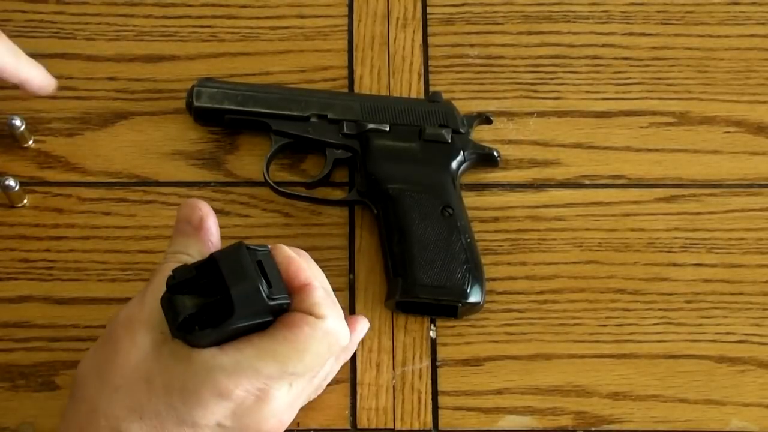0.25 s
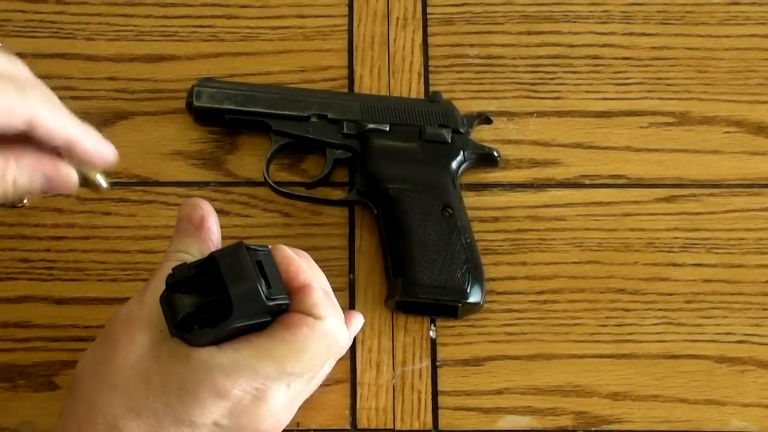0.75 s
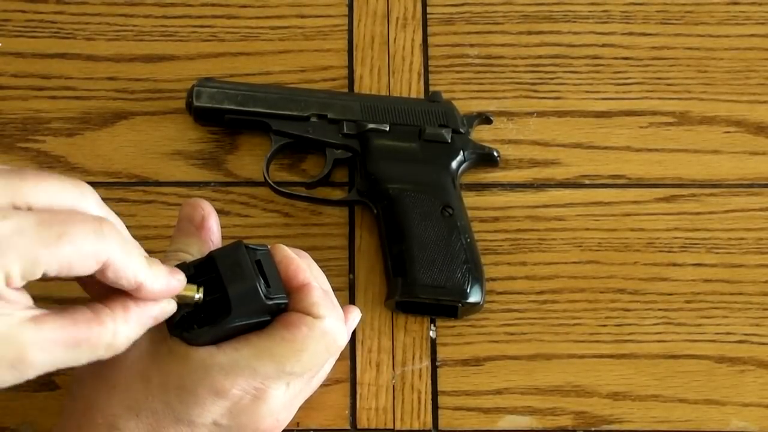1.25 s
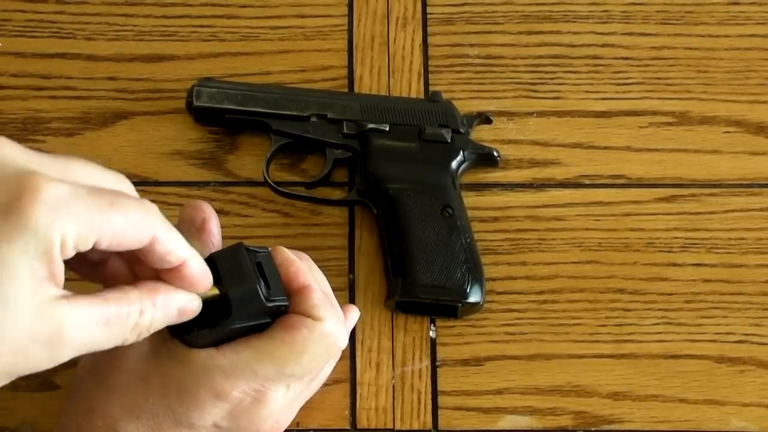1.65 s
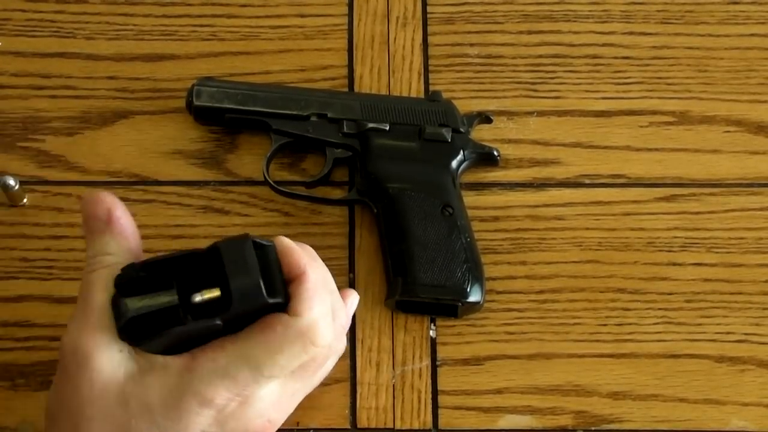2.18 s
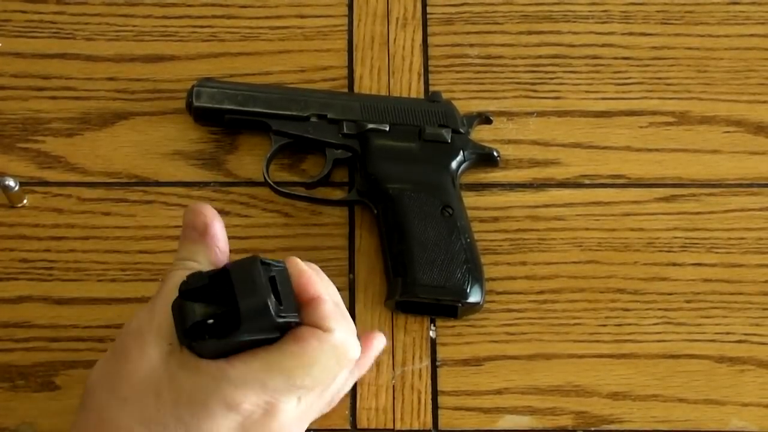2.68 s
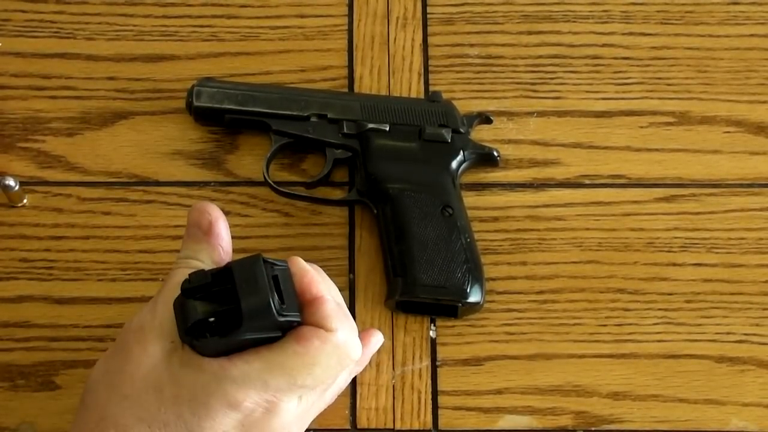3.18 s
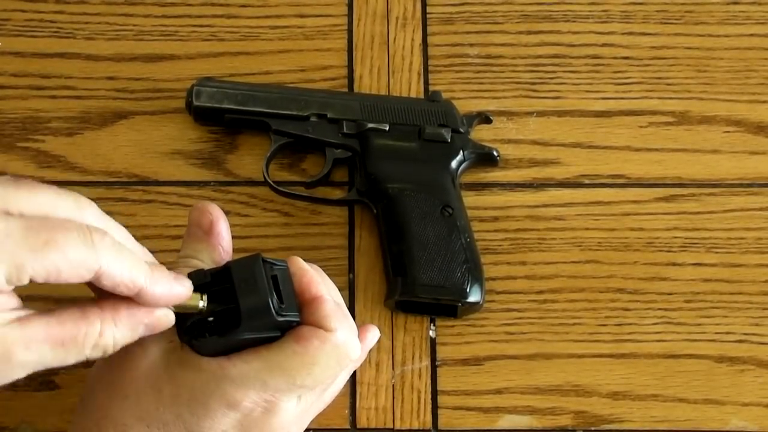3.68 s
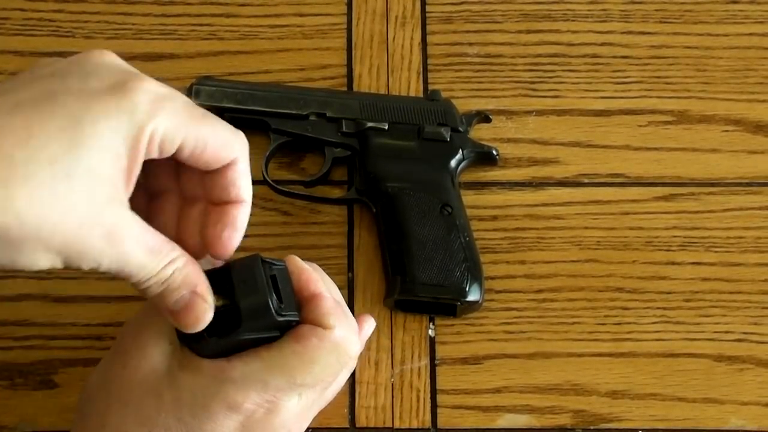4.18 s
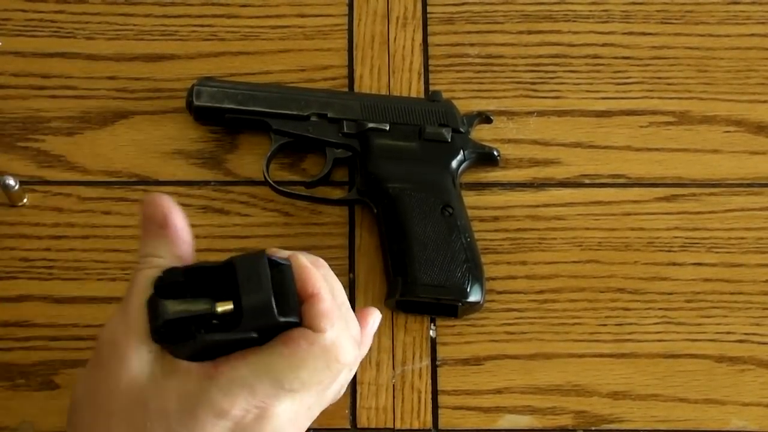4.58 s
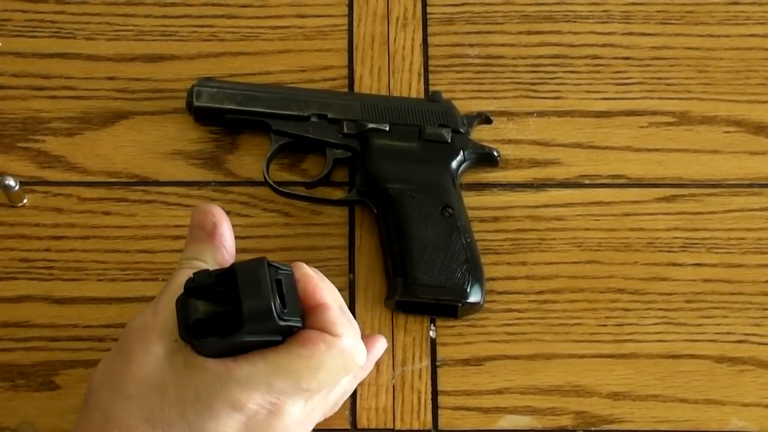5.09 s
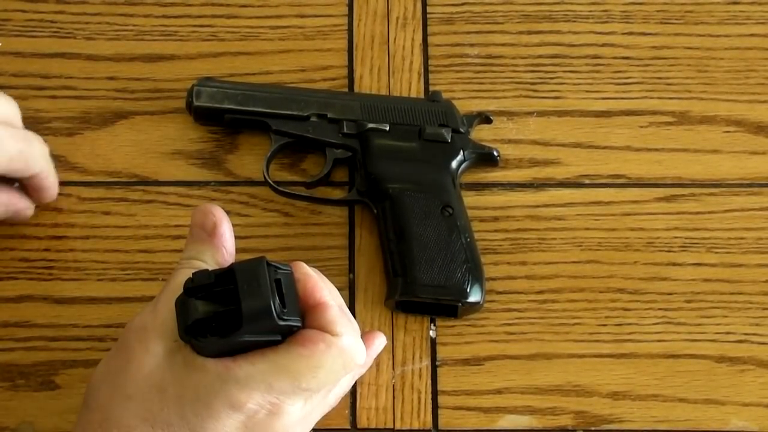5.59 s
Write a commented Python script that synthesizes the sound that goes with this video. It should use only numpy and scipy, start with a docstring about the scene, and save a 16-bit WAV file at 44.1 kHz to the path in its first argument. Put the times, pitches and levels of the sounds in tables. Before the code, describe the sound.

Clusters of dry metal clicks, plastic taps and tiny gritty slides alternate with near-quiet pauses. The strongest crack comes early as one cartridge seats; a softer round of clicking follows later, ending with plastic knocks and a soft forearm rub on the table. Recorded very close in stereo, in a lived-in room with a short tail, over low rumble, slight mains hum and hiss.

```python
"""Sharp metallic clicks and slides close by: a hand presses cartridges into a pistol magazine with a plastic
loader on a wooden table. Brass, steel and plastic are struck or rubbed by noise and answer with their resonances;
the table top knocks and is rubbed. Decaying noise echoes form a furnished room, over a low rumble, mains hum
and microphone hiss made of shaped noise and a wavering sine."""
import sys
import numpy as np
from scipy import signal
from scipy.fft import rfft, irfft, next_fast_len
from scipy.io import wavfile
from scipy.ndimage import map_coordinates

SR = 44100
rng = np.random.default_rng(int(sys.argv[2]) if len(sys.argv) > 2 else 0)


def persist_wave(psi):
    """Save psi, clipped to +-1, as 16-bit WAV."""
    counts = np.round(np.clip(psi, -1, 1) * 32767).astype(np.int16)
    wavfile.write(sys.argv[1], SR, np.atleast_2d(counts).T)


N = 257984  # length in samples

# brass and steel clicking in the loader: start_s, loader_level_db, pitch_hz, table_level_db, metal_level_db
METAL_CLICKS = [(0.0386, -8, 6120, -35.5, -29.5), (0.0573, -25, 6100, -30.5, -42.5),
                (0.1295, -13, 3370, -37, -34), (0.19, -18, 3920, -33.5, -30),
                (0.2577, -7, 2930, -12.5, -25), (1.0682, -18.5, 3960, -30.5, -38),
                (1.2495, -13, 4564, -49, -45.5), (1.2781, -8, 3906, -45, -35),
                (1.408, 4.5, 6350, -20, -0.5), (1.4344, -22, 5475, -31, -27.5),
                (1.497, -5.5, 3170, -18.5, -9.5), (1.6129, -10.5, 4990, -36.5, -42.5),
                (1.9538, -37.5, 6420, -67, -34), (1.98, -15, 6440, -46, -17.5),
                (2.0081, -11.5, 4070, -31.5, -14.5), (2.021, -5.5, 5140, -37.5, -27.5),
                (2.0264, -6.5, 6150, -44, -12), (2.0339, -12.5, 5400, -38, -20),
                (2.089, -18.5, 3910, -48.5, -24.5), (2.151, -21.5, 2880, -51, -34),
                (2.4652, -13, 3340, -44, -13.5), (2.606, -20.5, 4320, -37, -37),
                (2.6956, -15, 4013, -21.5, -11), (2.7081, -5.5, 4760, -32.5, -25.5),
                (3.6698, -12, 5900, -35.5, -36), (3.834, -32.5, 5650, -60, -44),
                (3.9375, -25.5, 4830, -69, -85), (3.9885, -30.5, 6710, -48, -61),
                (4.115, -8, 4070, -23.5, -33), (4.3089, -11.5, 4190, -57, -27),
                (4.3134, -16.5, 5870, -51, -22), (4.3347, -18.5, 5990, -40, -28),
                (4.352, -20, 3890, -37, -32), (4.3832, -12.5, 3800, -34, -25),
                (4.6817, -13, 4870, -40, -25), (4.805, -22.5, 5970, -35, -38)]
# plastic knocking on plastic and wood: start_s, shell_level_db, loader_level_db, table_level_db
PLASTIC_KNOCKS = [(0.201, -23.5, -20, -22), (0.5652, -32, -42, -39), (0.5984, -20, -32.5, -36),
                  (1.3464, -45, -41, -39.5), (1.735, -47, -35, -34), (1.9157, -51, -39, -47),
                  (2.1864, -28, -29, -47.5), (2.2405, -31, -31.5, -49), (2.2481, -23, -30.5, -42),
                  (2.2867, -40, -34, -38.5), (2.3894, -32.5, -37, -55), (2.797, -25, -23.5, -24.5),
                  (3.1881, -35.5, -62, -41.5), (4.4148, -28, -28, -56), (4.4749, -34, -35, -35.5),
                  (4.5164, -24, -29, -62), (4.596, -46, -43.5, -60), (4.6275, -30, -39, -58),
                  (4.7723, -24, -24, -57), (4.8165, -51, -37, -30), (4.8332, -26.5, -27, -40),
                  (4.9572, -22, -32, -22.5), (5.6343, -23, -37, -34.5)]
SHELL_DB, SHELL_DB_PER_OCT = -11, -8.5  # shell level against the loader for a click at 4 kHz, and its slope
KNOCK_PITCH_HZ, KNOCK_METAL_DB = 3240, -30  # metal level against the loader
CLICK_T60_S, KNOCK_T60_S = 0.014, 0.028  # rattle after the crack
CLICK_RISE_S, KNOCK_RISE_S = 0.0018, 0.001  # time constants of the onset
BOUNCE_S, BOUNCE_SCATTER_S, BOUNCE_DB = 0.011, 0.002, -16


def contacts():
    """Restitution: every contact lands a second time, weaker; deeper clicks put more of their blow into the shell.

    Columns: start_s, loader_db, table_db, shell_db, metal_db, rattle_t60_s, pitch_hz, rise_s."""
    rows = []
    for start_s, loader_db, pitch_hz, table_db, metal_db in METAL_CLICKS:
        shell_db = loader_db + SHELL_DB + SHELL_DB_PER_OCT * np.log2(pitch_hz / 4000)
        rows.append((start_s, loader_db, table_db, shell_db, metal_db, CLICK_T60_S, pitch_hz, CLICK_RISE_S))
    for start_s, shell_db, loader_db, table_db in PLASTIC_KNOCKS:
        metal_db = loader_db + KNOCK_METAL_DB
        rows.append((start_s, loader_db, table_db, shell_db, metal_db,
                     KNOCK_T60_S, KNOCK_PITCH_HZ, KNOCK_RISE_S))
    first = np.array(rows)
    bounce = first + BOUNCE_DB * np.array([0, 1, 1, 1, 1, 0, 0, 0])
    bounce[:, 0] += BOUNCE_S + BOUNCE_SCATTER_S * rng.standard_normal(len(rows))
    return np.vstack([first, bounce])


# resonances of the loader: centre_hz, width_hz, relative_level_db
LOADER_MODES = [(3190, 1120, 7.5), (3710, 650, 13.5), (4530, 2640, 6), (5356, 283, 11.5), (5980, 3050, 9),
                (7930, 1230, -8.5)]
# resonances of the table top: centre_hz, width_hz, relative_level_db
TABLE_MODES = [(330, 154, -3.5), (443, 55, 9.5), (550, 144, 7), (816, 197, 9), (1000, 210, -2),
               (1493, 350, -5.5)]
# resonances of the plastic shell: centre_hz, width_hz, relative_level_db
SHELL_MODES = [(1428, 483, 5.5), (1770, 212, -1.5), (2170, 392, 8.5), (2746, 690, -8.5), (4104, 1600, -7)]
# resonances of the metal parts: centre_hz, width_hz, relative_level_db
METAL_MODES = [(8090, 2300, -1.5), (10500, 1540, -1.5), (10970, 1700, 1), (13600, 670, -5.5),
               (14360, 5300, -11)]
# resonances of the table frame: centre_hz, width_hz, relative_level_db
FRAME_MODES = [(89.6, 93, 0), (156, 90, 0.0056)]
FRAME_DB = -17  # against the table top


def clicks():
    """Impact excitation: a crack and a short rattle ring the modes of the loader, table, shell, metal and frame.

    Rows: sound at the ports, its left-right part, and the even average over directions that fills the room."""
    size = 4096
    out = np.zeros((3, N + size))
    t = np.arange(size) / SR
    f = np.fft.rfftfreq(size, 1 / SR)
    loader, table, shell, metal, frame = [
        modal(modes, f) for modes in (LOADER_MODES, TABLE_MODES, SHELL_MODES, METAL_MODES, FRAME_MODES)]
    loader_hz, shell_hz = np.array(LOADER_MODES)[:, :1], np.array(SHELL_MODES)[:, :1]
    scatter_db = np.array([3, 3, 1.3])[:, None, None]  # directions differ more than the room average
    for start_s, loader_db, table_db, shell_db, metal_db, t60_s, pitch_hz, rise_s in contacts():
        crack = 2.2 * amp(-60 * t / 0.00341)
        shape = (amp(-60 * t / t60_s) + crack) * (1 - np.exp(-t / rise_s))
        blow = rfft(rng.standard_normal((2, size)) * shape)
        blow = np.vstack([blow, np.ones(len(f))])[:, None]  # the room row gets a bare impulse
        # modes near the contact's pitch ring most
        struck_loader = loader * amp(-9 * np.log2(loader_hz / pitch_hz) ** 2)
        # a blow that goes into the table favours the low modes of the shell
        lean_db = 1.2 * np.clip(table_db - shell_db + 4.5, -12, 12) * np.log2(1900 / shell_hz)
        # plastic damps the treble skirts of the shell modes
        struck_shell = shell * amp(lean_db) / (1 + 1j * f / 4500) ** 2
        total = 0
        for part, db in ((struck_loader, loader_db), (table, table_db), (struck_shell, shell_db),
                         (metal, metal_db), (frame, table_db + FRAME_DB)):
            ring = blow * part
            # every mode takes its share of the blow, give or take a random few dB
            ring *= np.linalg.norm(part, axis=1, keepdims=True) / np.linalg.norm(ring, axis=2, keepdims=True)
            ring *= amp(scatter_db * rng.standard_normal((len(part), 1)))
            total = total + amp(db) * ring.sum(axis=1) / np.linalg.norm(part)
        energy_scale = np.sqrt(size / 2 * t60_s * SR / (2 * np.log(1000)))  # longer rattles carry more energy
        out[:, round(start_s * SR):][:, :size] += irfft(total, size) * energy_scale
    return out[:, :N]


# sliding parts: start_s, end_s, scrape_level_db at the end, swell_db on the way,
# shell_level_db and table_level_db against the scrape
SLIDE_STROKES = [(0.034, 0.032, -17, 9, -12, -20.5), (0.116, 0.166, -39.5, 2, -13, 0.5),
                 (0.182, 0.194, -24.5, 5.5, -1, -22), (1.594, 1.62, -31.5, 4, -6.5, -13.5),
                 (2.05, 2.24, -45.5, -5, -9, -25), (2.413, 2.455, -31.5, 18.5, -3.5, -37),
                 (2.601, 2.685, -36, 10, -7.5, -9), (3.863, 3.875, -40, 0, -7.5, -16),
                 (4.314, 4.365, -37, -15.5, -17, -34), (4.434, 4.5, -41, 1, -1.5, -16),
                 (4.646, 4.665, -35.5, 1.5, -6.5, -30), (4.81, 4.875, -38.5, 4.5, -9, -6),
                 (4.918, 4.95, -29.5, 10.5, -4.5, 0.5)]
SLIDE_RISE_S, SLIDE_FADE_DB_PER_S = 0.0083, 901.5


def slides():
    """Dry friction: noise with uneven fast grip rings the loader, metal, shell and table."""
    grit = rng.standard_normal(N) * amp(4 * wobble(250) + 2.5 * wobble(40))
    scrape = strokes(SLIDE_STROKES, SLIDE_RISE_S, SLIDE_FADE_DB_PER_S)
    shell_gain, table_gain = amp(np.transpose(SLIDE_STROKES)[4:]) @ scrape
    metal = amp(-13.5) * unit(ringing(grit, METAL_MODES))
    bright = unit(unit(ringing(grit, LOADER_MODES)) + metal)
    shell = shell_gain * unit(ringing(grit, SHELL_MODES))
    table = table_gain * unit(ringing(grit, TABLE_MODES))
    return scrape.sum(axis=0) * bright + shell + table


# magazine base and hand pushing on the table top: start_s, hold_s, level_db
PUSHES = [(0, 0.077, -43.5), (.26, 0.036, -42), (1.505, 0.0067, -39), (1.7, 0.13, -54.5),
          (2.02, 0.085, -50.5), (2.25, 0.014, -44.5), (2.465, 0.023, -36.5), (2.78, 0.105, -47),
          (4.3, .25, -48.5), (4.685, 0.0058, -37), (4.93, .03, -50)]
# table resonances under the pushes: centre_hz, width_hz, relative_level_db
PUSH_MODES = [(212.7, 190, -6), (284, 22, -2), (334, 98, -4.5)]
PUSH_RISE_S, PUSH_FADE_DB_PER_S = 0.015, 138
# forearm dragging over the table top: start_s, hold_s, level_db
FOREARM_DRAGS = [(2.71, 0.06, -45), (4.694, 0.019, -39.5), (5.445, 0.088, -44)]
# table resonances under the forearm: centre_hz, width_hz, relative_level_db
DRAG_MODES = [(172.4, 41, -8), (430.4, 38, -31)]
DRAG_RISE_S, DRAG_FADE_DB_PER_S = 0.046, 192


def rubs():
    """Forced vibration: soft uneven pushes keep the low modes of the table moving."""
    force = rng.standard_normal((2, N)) * amp(1.5 * wobble(30))
    push = held(PUSHES, PUSH_RISE_S, PUSH_FADE_DB_PER_S)
    drag = held(FOREARM_DRAGS, DRAG_RISE_S, DRAG_FADE_DB_PER_S)
    return push * unit(ringing(force[0], PUSH_MODES)) + drag * unit(ringing(force[1], DRAG_MODES))


# reverberation time: frequency_hz, t60_s
ROOM_T60 = [(100, 0.16), (260, 0.17), (700, 0.55), (1840, 0.41), (4850, 0.54), (12800, 0.37)]
# strength of the room answer: frequency_hz, level_db
ROOM_LEVEL = [(100, -9.5), (500, 5.5), (2000, -2.5), (6000, -9.5), (9000, -9), (15000, -9.5)]
# what differs between the two microphone ports: frequency_hz, level_db
PORT_DIFFERENCE = [(100, -17), (500, -32.5), (2000, -33.5), (4000, -18), (8000, -11), (14000, -7)]


def room(x):
    """Reverberation: each frequency dies at its own speed; every 0.1 s of sound meets a new set of echoes."""
    out, step = np.zeros((2, N + 2 * SR)), SR // 10
    for begin in range(0, N, step):
        noise = rng.standard_normal((2, SR // 2))
        hz, t, bands = signal.stft(noise, SR, nperseg=256)
        # close ports hear nearly alike echoes
        apart = amp(along(PORT_DIFFERENCE, hz) + 6)[:, None] * bands[1]
        echoes = bands[0] + apart * np.array([1, -1])[:, None, None]
        decay = amp(-60 * t / along(ROOM_T60, hz)[:, None])
        decay /= np.linalg.norm(decay, axis=1, keepdims=True)
        decay *= amp(along(ROOM_LEVEL, hz))[:, None]
        tail = signal.istft(echoes * decay, SR, nperseg=256)[1] / np.sqrt(128)
        wet = signal.fftconvolve(x[None, begin:begin + step], tail, axes=1)
        out[:, begin + 200:][:, :wet.shape[1]] += wet  # echoes start 200 samples late
    return out[:, :N]


# slow course of the low sounds: time_s, rumble_level_db, hum_level_db
LOW_LEVELS = [(0.0, -50, -47), (0.37, -49.5, -53), (0.72, -57.5, -64.5), (2.64, -54, -50.5),
              (3.89, -61, -61.5), (4.9, -45, -52), (5.85, -60, -61)]
# room tone and hiss spectrum: frequency_hz, relative_level_db per Hz
AIR_SPECTRUM = [(82, -29.5), (140, -13), (221, -3), (239, -5), (328, -4), (451, -4.5), (657, -7),
                (868, -6.5), (958, -8), (1220, -8), (1290, -8), (2970, -8.5), (16000, -25.5)]
AIR_DB = -50


def background():
    """Stationary noise: hiss and room tone, a wandering rumble near 40 Hz and a wavering hum."""
    t = np.arange(N) / SR
    time_s, *level_columns = np.transpose(LOW_LEVELS)
    rumble_gain, hum_gain = amp([np.interp(t, time_s, db) for db in level_columns])
    air = pair(lambda hz: amp(along(AIR_SPECTRUM, hz)))
    rumble = pair(lambda hz: 1 / (1 + ((hz - 40) / 14) ** 2))
    tone = 1.02 * np.sin(2 * np.pi * 118 * t + 0.69 * wobble(29))
    hum = tone + pair(lambda hz: 1 / (1 + ((hz - 98) / 22) ** 2))
    hum = unit(hum * amp(1.84 * wobble(5.6)))
    return amp(AIR_DB) * air + rumble_gain * rumble + hum_gain * hum


# left-right likeness of the background: frequency_hz, correlation (1 = identical)
LIKENESS = [(40, 1), (130, 0.81), (290, 0.68), (1400, 0.093), (6800, 0.067), (15000, .05)]


def pair(spectrum):
    """Diffuse-field coherence: stereo noise of rms 1, less alike in the treble."""
    def mid_side(hz):
        angle = np.arccos(np.clip(along(LIKENESS, hz), -1, 1)) / 2
        return spectrum(hz) * [np.cos(angle), np.sin(angle)]
    mid, side = filtered(rng.standard_normal((2, N)), mid_side)
    return unit(np.array([mid + side, mid - side]))


def modal(modes, f):
    """Modal superposition: one steep-skirted resonance a row; alternating signs fill the gaps between neighbours."""
    centre, width, db = np.transpose(modes)[:, :, None]
    sign = (-1) ** np.arange(len(modes))[:, None]
    bandpass = 1j * f * width / (centre * centre - f * f + 1j * f * width)
    return sign * amp(db) * bandpass ** 2


def ringing(x, modes):
    """Linear response: x through the sum of a set of resonances."""
    return filtered(x, lambda f: modal(modes, f).sum(axis=0))


def strokes(rows, rise_s, fade_db_per_s):
    """Amplitude envelope: one gain per row (start_s, end_s, end_db, swell_db) with rise, straight swell and fade."""
    t = np.arange(N) / SR
    start, end, end_db, swell_db = np.transpose(rows)[:4, :, None]
    progress = np.clip((t - start) / np.maximum(end - start, 0.002), 0, 1)
    level_db = end_db - swell_db * (1 - progress)
    rise = np.clip((t - start) / rise_s + 1, 0, 1)  # complete at the start time
    return rise * amp(level_db - fade_db_per_s * np.maximum(t - end, 0))


def held(rows, rise_s, fade_db_per_s):
    """Steady envelope: the summed gain of rows (start_s, hold_s, level_db) without swell."""
    flat = [(start_s, start_s + hold_s, db, 0) for start_s, hold_s, db in rows]
    return strokes(flat, rise_s, fade_db_per_s).sum(axis=0)


def wobble(rate_hz):
    """Band-limited fluctuation: a smooth random curve with rate_hz knots a second."""
    knots = rng.standard_normal(int(N * rate_hz / SR) + 4)
    return map_coordinates(knots, [np.arange(N) * rate_hz / SR])


def filtered(x, response):
    """Convolution theorem: the spectrum of x times a complex response of frequency."""
    n = x.shape[-1]
    m = next_fast_len(n + 8192)
    return irfft(rfft(x, m) * response(np.fft.rfftfreq(m, 1 / SR)), m)[..., :n]


def along(points, hz):
    """Logarithmic frequency scale: (frequency_hz, value) points joined on a log axis."""
    f, value = np.transpose(points)
    return np.interp(np.log(hz + 1), np.log(f + 1), value)


def amp(db):
    """Decibel definition: level to amplitude gain."""
    return 10 ** (np.asarray(db) / 20)


def unit(x):
    """Mean-square normalisation: x scaled to rms 1."""
    return x / np.sqrt(np.mean(x ** 2) + 1e-20)


def scene():
    """Superposition: direct sound, slightly different at the two ports, plus its room answer and the background."""
    near, other, spread = clicks()
    steady = slides() + rubs()
    # a delayed copy of the friction stands in for its left-right part
    side = filtered(other + np.roll(steady, 300), lambda hz: amp(along(PORT_DIFFERENCE, hz)))
    direct = np.array([near + steady + side, near + steady - side])
    balance = amp([[0.15], [-0.15]])
    return direct * balance + room(spread + steady) + background()


SKEW = 0.3  # overload pulls the signal to one side
TOP_HZ = 16000


def record(dry):
    """Nonlinear transduction: housing dip near 8 kHz, small offset, lopsided soft clipping and band limit."""
    x = filtered(dry, lambda f: 1 - 0.7 * 1j * f * 600 / (7900 ** 2 - f * f + 1j * f * 600))
    x = x - 0.0084
    x = x - SKEW * np.maximum(np.abs(x) - 1, 0)
    x = x / (1 + np.abs(x / 0.95) ** 8) ** (1 / 8)
    return filtered(x, lambda hz: hz < TOP_HZ)


dry = scene()
out = record(dry)
persist_wave(out)
```